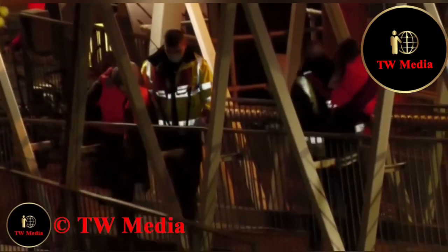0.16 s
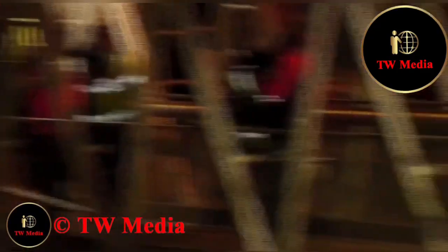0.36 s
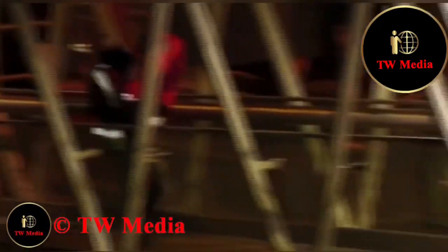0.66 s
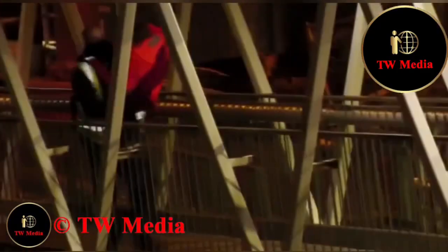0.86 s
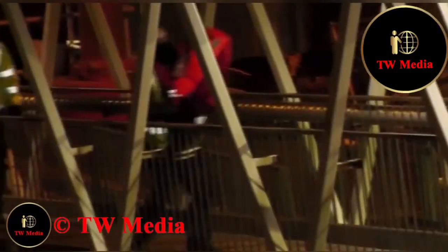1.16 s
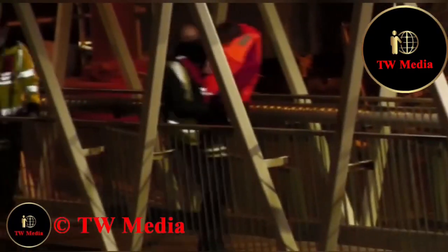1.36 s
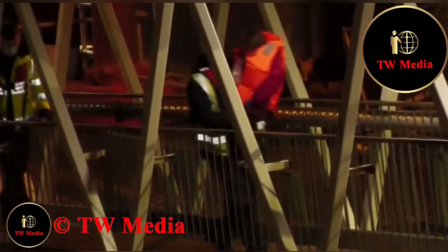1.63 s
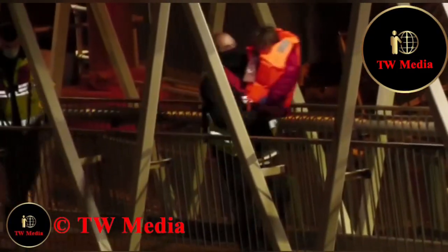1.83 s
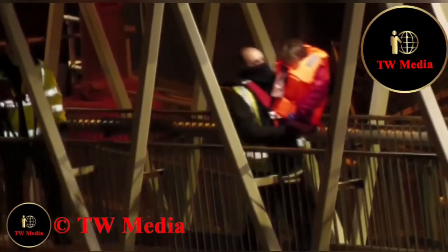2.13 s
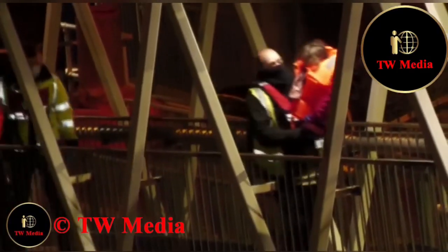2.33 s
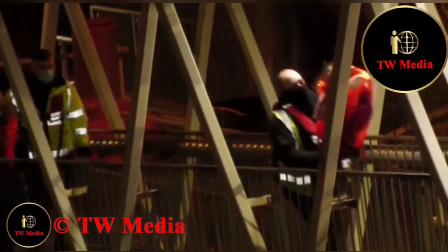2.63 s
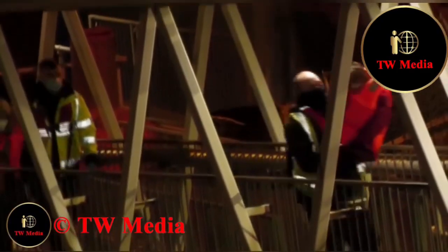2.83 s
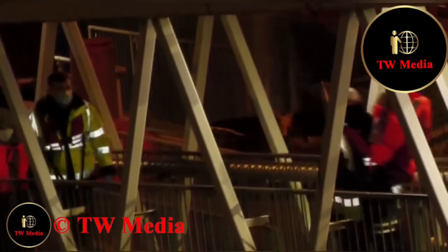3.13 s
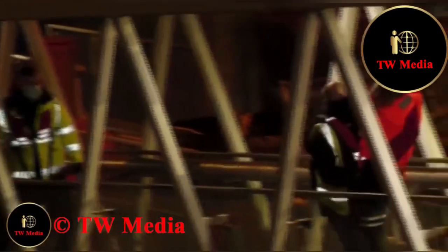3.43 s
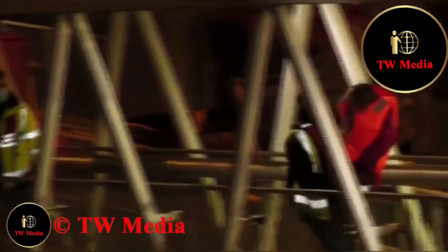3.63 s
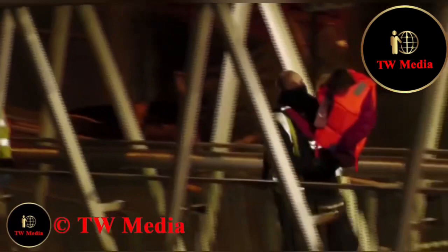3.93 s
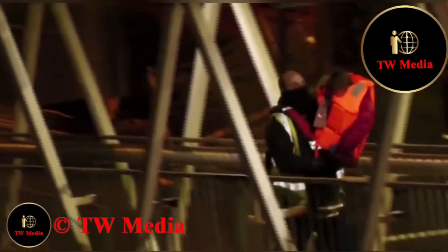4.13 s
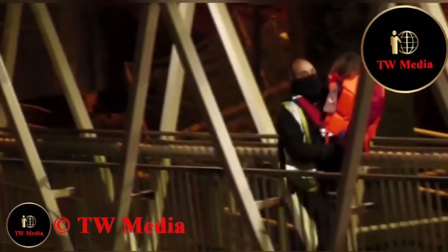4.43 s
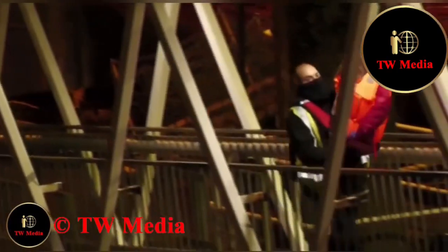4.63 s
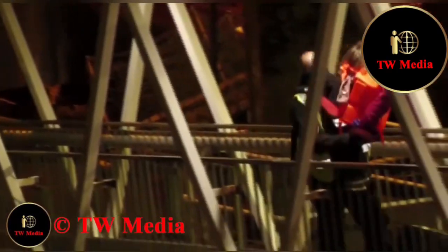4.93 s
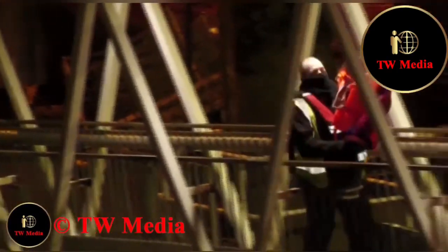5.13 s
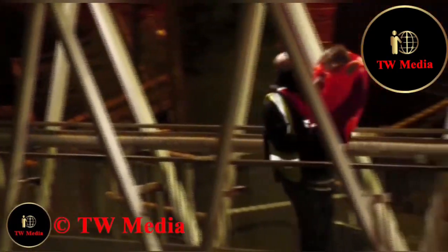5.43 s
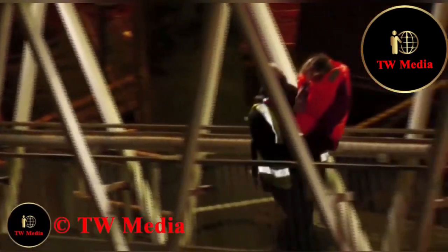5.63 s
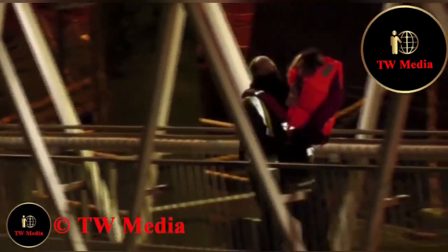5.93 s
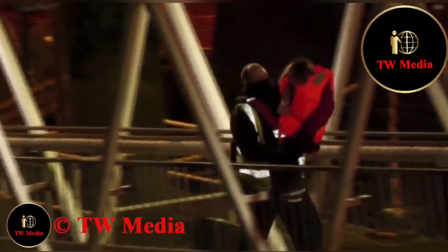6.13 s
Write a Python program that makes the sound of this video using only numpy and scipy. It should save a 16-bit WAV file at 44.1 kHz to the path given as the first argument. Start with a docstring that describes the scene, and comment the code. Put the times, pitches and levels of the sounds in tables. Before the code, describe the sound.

A ship's diesel engine idles steadily with a low, pulsing throb that swells and fades over light mechanical clatter.

```python
"""Ship diesel idling at a quay

A six-cylinder diesel runs on the left. Its repeating cycle makes a stack of tones ("orders": whole
multiples of the cycle rate) over a pulsing exhaust roar, firing knocks and clacking valve gear.
A generator hums just below order 12, so the low throb swells and fades. Something chatters and
squeaks faintly, a gear whines, and a wash of noise with a bright hiss widens the stereo picture."""
import sys
import numpy as np
from scipy import signal
from scipy.fft import rfft, irfft, next_fast_len
from scipy.io import wavfile
from scipy.ndimage import map_coordinates

SR = 44100
rng = np.random.default_rng(int(sys.argv[2]) if len(sys.argv) > 2 else 0)


def to_wav(sig):
    """Store sig (one row per channel, or 1-D mono) as 16-bit WAV at the path in sys.argv[1].

    Samples outside -1..1 are clipped; the rate is SR.
    """
    pcm = np.clip(np.atleast_2d(sig), -1, 1) * 32767
    pcm = np.round(pcm).astype(np.int16)
    wavfile.write(sys.argv[1], SR, pcm.T)  # frames by channels


N = 276507

RPM = 753.6
CYCLE_HZ = RPM / 120  # one engine cycle is two turns of the shaft
CYCLE_SAMPLES = 8192  # points in one cycle's waveform
FIRST_FIRING = .02  # cycles
# How hard each cylinder fires, in firing order: (level [dB])
CYLINDER_DB = [2.3, 0.71, 1.8, 1.8, 2, 1.5]
# How sound carries across the water: (time [s], level [dB], treble tilt [dB per octave])
OVER_WATER = [(0.0, 0, -3.5), (6.27, 0.5, -7)]


def amp(db):
    """Turn decibels into a gain."""
    return 10 ** (np.asarray(db) / 20)


def at_pitch(rows, hz, column=1):
    """Read a table between its rows, on a log frequency scale."""
    table = np.transpose(rows)
    return np.interp(np.log(hz + 1), np.log(table[0] + 1), table[column])


def over_time(rows, column=1):
    """Read a table between its rows, giving one value a sample."""
    table = np.transpose(rows)
    return np.interp(np.arange(N) / SR, table[0], table[column])


def wobble(rate):
    """A smooth curve through `rate` random values a second."""
    return map_coordinates(rng.standard_normal(int(N * rate / SR) + 4), [np.arange(N) * rate / SR])


def filtered(sound, response):
    """Filter a sound; response(hz) gives the gain and phase at each frequency."""
    size = next_fast_len(N + SR // 2)
    return irfft(rfft(sound, size) * response(np.fft.rfftfreq(size, 1 / SR)), size)[..., :N]


def noise_gain(spectrum, hz):
    """The gain that gives white noise the levels in a spectrum table."""
    return amp(at_pitch(spectrum, hz)) * np.sqrt(SR / 2)


def shaft_cycles():
    """Engine cycles done at each sample; the speed governor hunts, so the pace wanders."""
    # The shaft's lead over a steady one: (time [s], angle [degrees])
    lead = [(0.0, -13.05), (0.37, -6.32), (0.74, -4.91), (1.11, -3.73), (1.48, -0.29), (1.84, 2.41),
            (2.21, 7.71), (2.58, 4.97), (2.95, 2.13), (3.32, 2.49), (3.69, 1.86), (4.06, -1.2), (4.43, 4.5),
            (4.79, 8.67), (5.16, 4.98), (5.53, -0.19), (5.9, -10.26), (6.27, -16.82)]
    return CYCLE_HZ * np.arange(N) / SR + over_time(lead) / 720


def firing_bumps(cycles, first, levels_db, sharpness):
    """Six smooth bumps a cycle, one for each firing."""
    gap = (cycles[:, None] - first - np.arange(6) / 6 + .5) % 1 - .5
    return np.exp(-(gap * sharpness) ** 2) @ amp(levels_db)


def casing(hz):
    """The engine's casing rings, lifting some pitches and dulling others."""
    # Its peaks and dips: (centre [Hz], width [Hz], lift [dB])
    resonances = [(236, 15, -3.5), (486, 17, 2), (536, 71, 0.5), (670, 45, 1.5), (773, 10, -1.5),
                  (813, 37, 3), (881, 5.3, -1.5), (1003, 47, -2.5), (1057, 46, 3.5), (1108, 36, 2.5),
                  (1214, 87, 4.5), (1350, 67, 3), (1430, 15, -1.5), (1500, 18, 3), (1534, 28, 6),
                  (2330, 75, -3.5), (2430, 74, 4), (2552, 44, 5), (2560, 25, -6), (2650, 43, 0.5),
                  (4250, 150, 1.5)]
    return amp(sum(db / (1 + (2 * (hz - centre) / width) ** 2) for centre, width, db in resonances))


def pulsing_noise(response, pulse, depth):
    """Noise that swells with each firing and loses treble across the water."""
    # How far each band swells, before scaling by depth: (frequency [Hz], swing [dB])
    swing = [(200, 1), (600, 5.5), (1400, 1.5), (3000, 0), (6000, 1.5)]
    hz, t, bands = signal.stft(rng.standard_normal(N), SR, nperseg=128)
    at = np.minimum((t * SR).astype(int), N - 1)
    treble_octaves = np.clip(np.log2((hz + 1) / 2500), 0, 2)
    swell_db = depth * np.outer(at_pitch(swing, hz), pulse[at])
    treble_db = np.outer(treble_octaves, over_time(OVER_WATER, column=2)[at])
    noise = signal.istft(bands * amp(swell_db + treble_db), SR, nperseg=128)[1][:N]
    return amp(over_time(OVER_WATER)) * filtered(noise, response)


def stereo_hiss(pulse):
    """A wide, out-of-phase wash with a bright hiss on top, pulsing slightly with the engine."""
    # Tone colour of the wash: (frequency [Hz], level [dB per Hz])
    spectrum = [(20, -86), (70, -80.5), (200, -89.5), (450, -82.5), (700, -72), (900, -68.5), (1400, -71),
                (2200, -77.3), (2600, -77.3), (3600, -79.3), (4200, -82), (5800, -84), (7200, -82),
                (8500, -78.5), (10000, -79), (11500, -88), (12100, -112)]
    return pulsing_noise(lambda hz: noise_gain(spectrum, hz), pulse, depth=.3)


def squeaks():
    """Short rough whistles that glide up and flutter as something sticks and slips."""
    # The clearer squeaks: (time [s], level [dB], length [s], starting pitch [Hz])
    clear = [(2.175, -46, .025, 4150), (4.005, -44, .03, 4050), (4.208, -40, .03, 4050),
             (4.45, -47, .03, 4080), (4.89, -47.5, .17, 4050), (5.31, -46, .04, 4120),
             (5.435, -45, .04, 4100), (5.487, -43, .022, 4150), (5.645, -45, .03, 4130),
             (5.806, -37, .03, 4170), (6.157, -39, .024, 4000)]
    glide_hz, flutter_hz, chatter_per_s = 260, 33, 16
    chance = rng.random((int(chatter_per_s * N / SR), 3))
    chatter = [((k + late) / chatter_per_s, -50.5 - 4 * softer, .023, 3980 + 76 * higher)
               for k, (late, softer, higher) in enumerate(chance)]
    out = np.zeros(N + SR)
    for start, db, length, hz in clear + chatter:
        t = np.arange(int(length * SR)) / SR
        pitch = hz + glide_hz * t / length
        roughness = rng.normal(0, 0.1, len(t))
        tone = np.sin(np.cumsum(2 * np.pi * pitch / SR + roughness))
        flutter = 1 + 0.43 * np.cos(2 * np.pi * flutter_hz * (t - length * .8))
        out[int(start * SR):][:len(t)] += amp(db) * np.hanning(len(t)) * flutter * tone
    return out[:N]


def gear_whine(hz=2133, level_db=-53.5, waver_hz=3):
    """A gear's thin tone, whose pitch wavers quickly."""
    pitch = hz + waver_hz * wobble(8.7)
    return np.sqrt(2) * amp(level_db) * np.sin(2 * np.pi * np.cumsum(pitch) / SR)


def generator_hum(cycles, hz=74.975, level_db=-40.3, in_step_s=1.9):
    """A steady hum that slides in and out of step with the engine's order 12."""
    phase = 12 * cycles[int(in_step_s * SR)] + hz * (np.arange(N) / SR - in_step_s)
    return np.sqrt(2) * amp(level_db) * np.cos(2 * np.pi * phase)


def valve_clacks(cycles, scatter_db=2, jitter_s=.001):
    """Loose valve gear strikes metal at set moments of each cycle, never twice alike."""
    # The strikes: (moment [cycles], average level [dB])
    strikes = [(.025, -34), (.365, -33), (.86, -35.5)]
    # The metal's ringing tones: (pitch [Hz], level [dB], time to fade by 60 dB [s])
    tones = [(1130, -2, .05), (1240, 0, .05), (1400, -1, .04), (1560, -2, .035), (1780, -4, .03),
             (2560, -7, .03)]
    hz, db, fade_s = np.transpose(tones)[:, :, None]
    out, t = np.zeros(N + SR), np.arange(SR // 10) / SR
    attack = 1 - np.exp(-t / .003)
    for moment, level_db in strikes:
        for at in np.interp(np.arange(int(cycles[-1])) + moment, cycles, np.arange(N)):
            detune, phase, louder = rng.standard_normal((3, len(hz), 1))
            fade = amp(db + 2 * louder - 60 * t / fade_s)
            ring = fade * np.sin(2 * np.pi * (hz * (1 + .03 * detune) * t + phase))
            late, strength = rng.standard_normal(2)
            clack = amp(level_db + scatter_db * strength) * ring.sum(0) * attack
            out[max(int(at + jitter_s * SR * late), 0):][:len(t)] += clack
    return out[:N]


def firing_knocks(cycles, jitter_s=.0004, scatter_db=1.5, fade_s=.2):
    """Each cylinder rings block and hull in its own way, varying a little in timing and force."""
    # Tone colour of the knocks: (frequency [Hz], level [dB per Hz])
    spectrum = [(900, -100), (1200, -72), (1500, -68), (1800, -70), (2100, -79.5), (2600, -71.5),
                (3500, -84), (4300, -83.5), (6000, -98.5), (7800, -110), (8100, -140)]
    head_start = .05  # cycles by which the ringing starts before the firing peaks
    t = np.arange(SR // 2) / SR
    rings = rng.standard_normal((6, len(t))) * amp(-60 * t / fade_s) * (1 - np.exp(-t / .0015))
    cycle = np.arange(-1, cycles[-1])
    late, strength = rng.standard_normal((2, 6, len(cycle)))
    due = cycle + FIRST_FIRING - head_start + np.arange(6)[:, None] / 6
    at = np.interp(due, cycles, np.arange(N), left=-SR) + jitter_s * SR * late
    hits = np.zeros((6, N + SR))
    for k in range(6):
        heard = at[k] >= 0
        hits[k, at[k, heard].astype(int)] = amp(CYLINDER_DB[k] + scatter_db * strength[k, heard])
    block = signal.fftconvolve(hits, rings, axes=1)[:, :N].sum(0)
    knocks = filtered(block / block.std(), lambda hz: noise_gain(spectrum, hz) * casing(hz))
    return amp(over_time(OVER_WATER)) * knocks


def exhaust_roar(pulse):
    """Exhaust noise that surges with each firing, coloured by the casing."""
    # Tone colour of the roar: (frequency [Hz], level [dB per Hz])
    spectrum = [(20, -66), (45, -60), (75, -60.5), (120, -60.5), (230, -62.5), (400, -63), (560, -61.5),
                (680, -62), (800, -66.5), (950, -66.5), (1300, -70.5), (2050, -70), (3600, -78),
                (5000, -76), (6600, -83.5), (7500, -86), (8050, -103), (8150, -140)]
    return pulsing_noise(lambda hz: noise_gain(spectrum, hz) * casing(hz), pulse, depth=.8)


def chug_phases(sizes, passes):
    """Line up the orders so that each band chugs six times a cycle, sweeping upward."""
    # How each band chugs: (from [Hz], to [Hz], delay [cycles], six firing levels [dB])
    chugs = [(85, 300, .065, [6, 1, 2, -4, 3, -3]), (300, 450, -.015, [2, 1, -1, 2, 0, 1]),
             (450, 610, .015, [0, 0, 5, 3, 1, 2]), (610, 760, .045, [1, 0, -1, 5, -4, 4]),
             (760, 1000, .02, [2, 1, 0, -1, 0, 1]), (1000, 1350, .02, [2, 1, 4, -1, 0, 3]),
             (1350, 3000, 0, [1, 1, 0, 0, 0, 1])]
    sweep = .04  # cycles by which the top of a band trails its bottom
    hz = np.arange(len(sizes)) * CYCLE_HZ
    one_cycle = np.arange(CYCLE_SAMPLES) / CYCLE_SAMPLES
    phases = 2 * np.pi * rng.random(len(sizes))
    for low, high, delay, levels_db in chugs:
        swell = firing_bumps(one_cycle, FIRST_FIRING + delay, levels_db, sharpness=12.5)
        band = (hz >= low) & (hz < high)
        for _ in range(passes):  # each pass pulls the band's loudness closer to the swell
            wave = np.fft.ifft(sizes * band * np.exp(1j * phases), CYCLE_SAMPLES)
            shaped = swell * np.exp(1j * np.angle(wave))
            phases[band] = np.angle(np.fft.fft(shaped))[:len(sizes)][band]
        rise = (hz - (low + high) / 2) / (high - low)
        phases[band] -= (np.pi * sweep * rise ** 2 * band.sum())[band]
    return phases


def engine_throb(cycles, unsteadiness=.15, tremble_cycles=.0009):
    """The stack of orders: one cycle's waveform, played over and over by the trembling shaft."""
    # The orders that stand out: (order [multiple of the cycle rate], level [dB])
    strong = [(6, -50), (9, -53), (12, -36.8), (15, -46), (16, -45.3), (21, -42.3), (24, -39.6), (29, -45),
              (30, -44.2), (33, -47.2), (42, -45.1), (52, -45), (56, -45.3), (58, -45.3), (62, -41.3),
              (63, -44.2), (64, -46), (69, -47.2), (70, -45.2), (75, -47), (76, -46.7), (78, -42.6),
              (84, -40), (88, -43.3), (89, -48), (90, -47), (91, -45.2), (96, -48), (108, -40.3),
              (111, -45.8), (115, -44.6), (117, -48), (129, -47), (152, -51), (169, -51), (178, -47)]
    # The crowd of weak orders between them: (frequency [Hz], average level [dB])
    weak = [(30, -70), (63, -58), (120, -54.5), (200, -58), (280, -54.5), (470, -54), (660, -54),
            (850, -58), (1050, -59), (1210, -57.5), (1400, -61), (1850, -65), (2400, -68.5), (3000, -90)]
    order = np.arange(CYCLE_SAMPLES // 2 + 1)
    hz = order * CYCLE_HZ
    scatter = np.sqrt(rng.gamma(1.6, 1 / 1.6, len(order)))
    sizes = amp(at_pitch(weak, hz)) * casing(hz) * scatter
    sizes[(order % 3 == 0) & (hz < 1164)] *= amp(4.5)  # every third order rises above the crowd
    sizes[[int(k) for k, _ in strong]] = amp([db for _, db in strong])
    phases = np.array([chug_phases(sizes, passes) for passes in (15, 1, 1)])
    phases[0, 12] = 0  # lets the generator fall in step at its set time
    # Two more waveforms drift in and out, making high orders less steady.
    drift = sizes * unsteadiness * np.minimum(order / 60, 1)
    spectra = np.array([sizes, drift, drift]) * np.exp(1j * phases)
    shapes = irfft(spectra, CYCLE_SAMPLES) * CYCLE_SAMPLES / np.sqrt(2)
    place = (cycles + tremble_cycles * wobble(5)) * CYCLE_SAMPLES
    steady, drift_a, drift_b = [np.interp(place, np.arange(CYCLE_SAMPLES), shape, period=CYCLE_SAMPLES)
                                for shape in shapes]
    return steady + drift_a * wobble(2.194) + drift_b * wobble(3.12)


def scene():
    """A forward and a sideways microphone, added for left and subtracted for right."""
    # What the sideways one picks up of the ship: (frequency [Hz], level [dB], phase [radians])
    pickup = [(50, -22.5, -.1), (100, -23, 0), (300, -21.5, -.1), (520, -16.5, -.1), (690, -11, -.2),
              (880, -7, -.8), (1100, -7.4, -1.35), (1800, -8, -1.05), (2200, -7.6, -.75), (2600, -5, -.5),
              (3100, -5, -.05), (3900, -5, -.4), (4600, -3.7, .1), (5800, -2, .45), (7200, -4, 1.2),
              (7800, -4, 1.9)]
    cycles = shaft_cycles()
    bumps = firing_bumps(cycles, FIRST_FIRING, CYLINDER_DB, sharpness=8.6)
    pulse = (bumps - bumps.mean()) / bumps.std() * amp(0.86 * wobble(22))
    engine = engine_throb(cycles) + firing_knocks(cycles) + valve_clacks(cycles)
    ship = engine + exhaust_roar(pulse) + generator_hum(cycles) + gear_whine() + squeaks()
    front = filtered(ship, lambda hz: hz < 8086)
    side = filtered(front, lambda hz: amp(at_pitch(pickup, hz)) * np.exp(1j * at_pitch(pickup, hz, 2)))
    side += stereo_hiss(pulse)
    return np.array([front + side, front - side])


def record(dry):
    """The camera drops the highest treble, and its signal rests slightly off zero."""
    top_hz, offset = 12200, 0.016
    return filtered(dry, lambda hz: hz < top_hz) + offset


dry = scene()
out = record(dry)
to_wav(out)
```